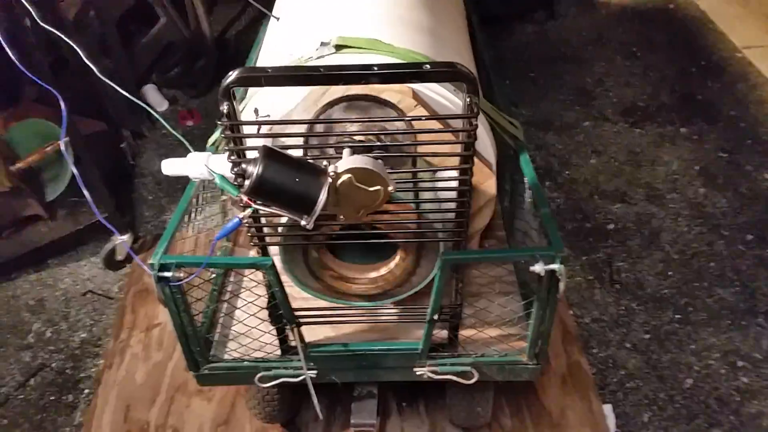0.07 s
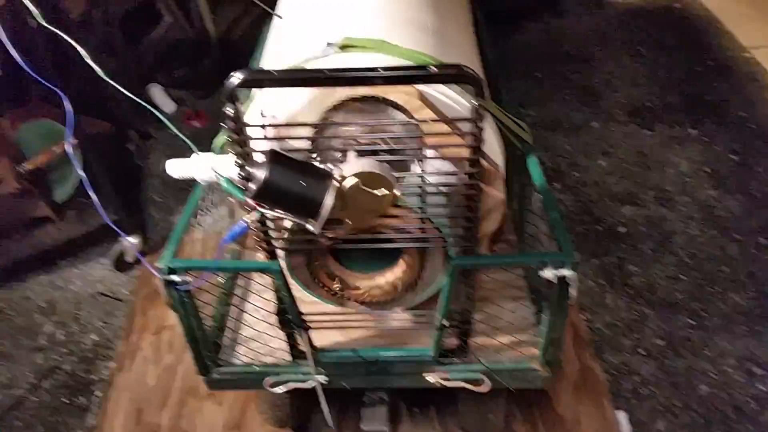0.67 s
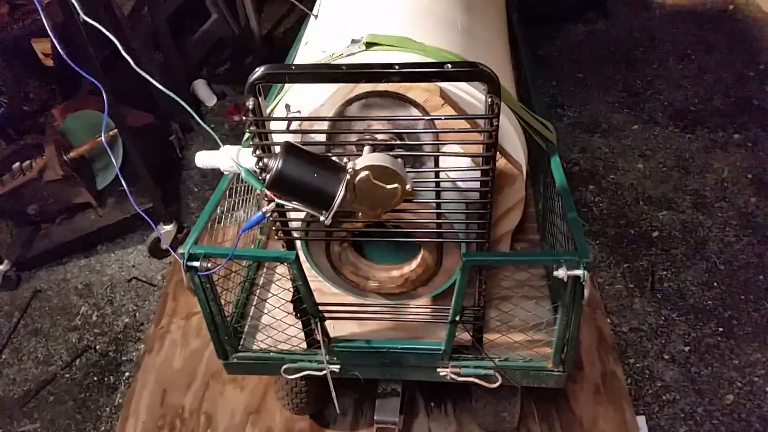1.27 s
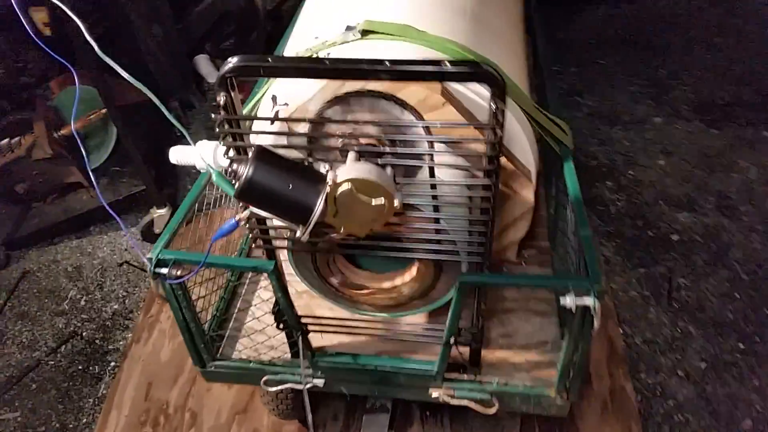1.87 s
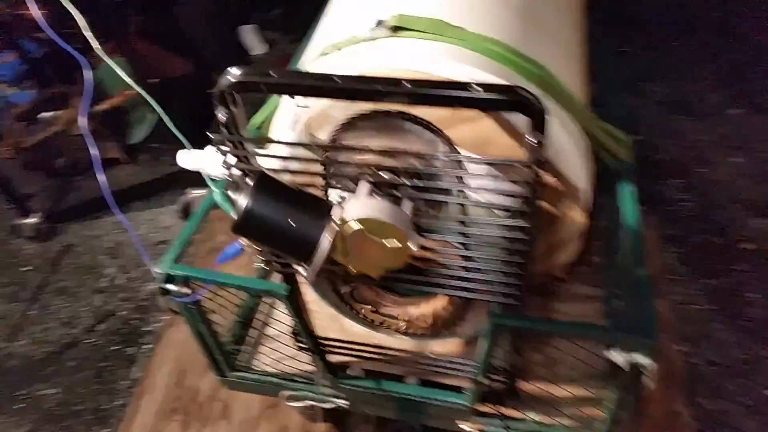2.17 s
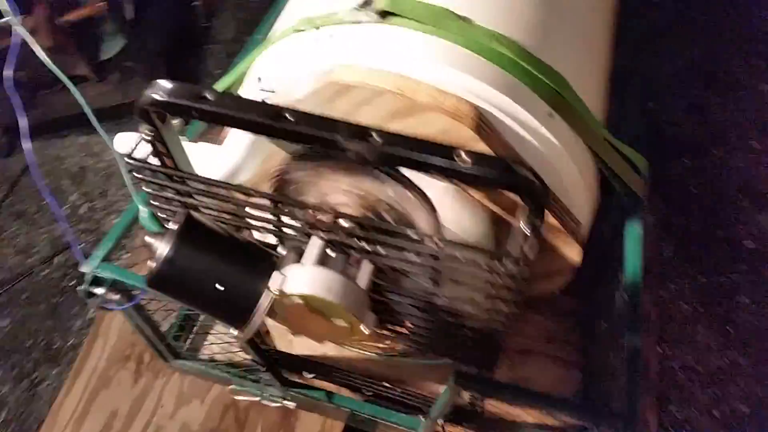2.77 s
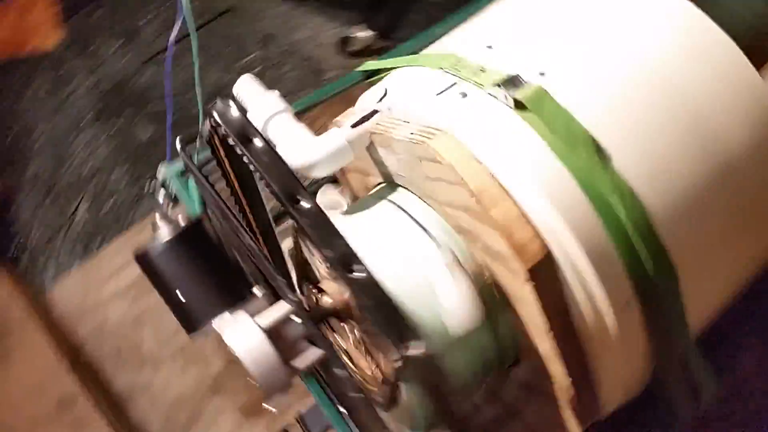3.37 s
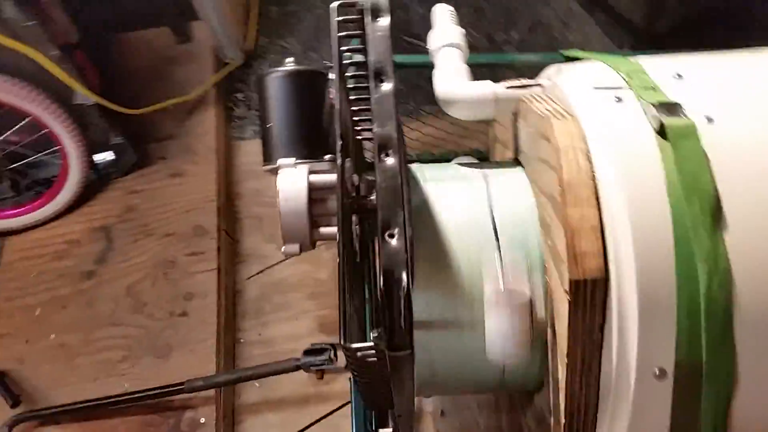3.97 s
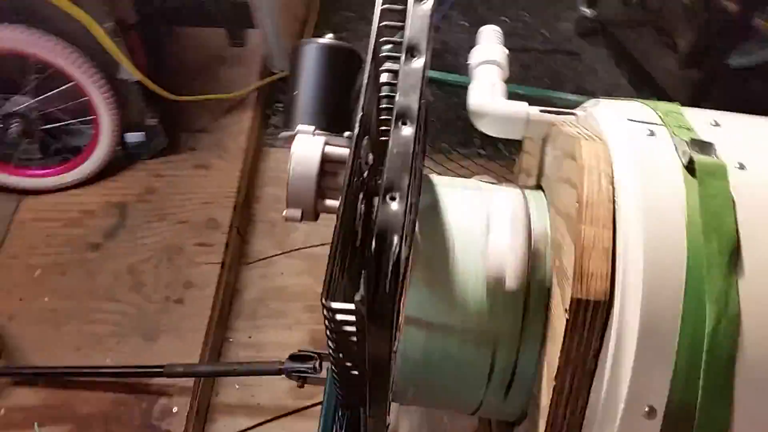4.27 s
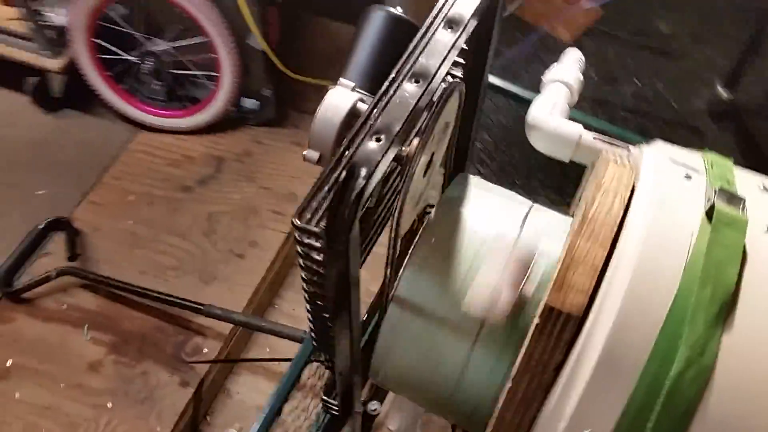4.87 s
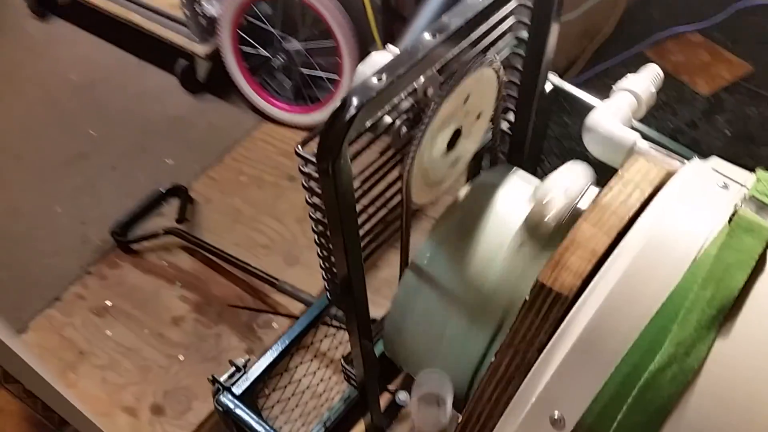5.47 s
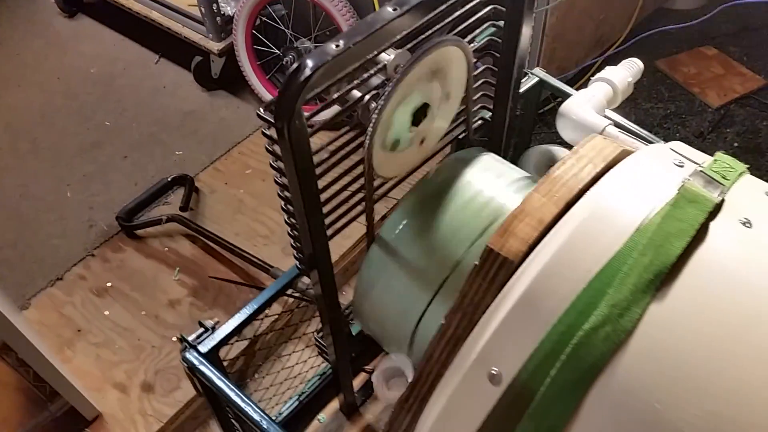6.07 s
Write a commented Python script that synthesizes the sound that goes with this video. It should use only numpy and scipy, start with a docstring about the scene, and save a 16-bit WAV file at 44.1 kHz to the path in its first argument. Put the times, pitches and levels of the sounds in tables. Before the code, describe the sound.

A small gear motor starts humming and a plastic drum begins to turn, a little under a second per turn. Each turn lurches, rumbles and knocks over rollers, then scrapes at the rim, while grit hisses and ticks down the wall. A sharp squeak comes just after the start. The hum fades as the close stereo microphone moves round to the side, and two more squeaks ring briefly in the workshop.

```python
"""A plastic trommel drum in a workshop, taken close on a stereo microphone carried from motor end to side.
After 0.4 s a small gear motor starts to hum, and the drum turns, each turn taking a little under a second.
Each turn opens with a lurch, rumbles and knocks over the rollers, and ends with two scrapes of the rim,
while grit hisses down the wall. Near 0.6 s the drive sticks and lets go with a sharp squeak that rings
in the room. From 2.3 s the hum fades as the microphone moves on; two more squeaks come at 4.3 and 5.3 s."""
import sys
import numpy as np
from scipy import signal
from scipy.fft import rfft, irfft
from scipy.io import wavfile
from scipy.ndimage import uniform_filter1d

SR = 44100
rng = np.random.default_rng(int(sys.argv[2]) if len(sys.argv) > 2 else 0)


def dump(signal):
    """Clip the signal to [-1, 1] and save it as 16-bit WAV at the path in sys.argv[1]."""
    limited = np.clip(np.atleast_2d(signal).T, -1, 1)
    pcm = np.round(limited * 32767).astype(np.int16)
    wavfile.write(sys.argv[1], SR, pcm)


N = 274743
T = np.arange(N) / SR
HZ = np.fft.rfftfreq(N, 1 / SR)

# The workshop's ring. Each row: frequency in Hz, seconds to die away by 60 dB.
WORKSHOP_DECAY = [(100, 0.34), (500, 0.22), (2500, 0.2), (8000, 0.2), (16000, 0.063)]
# The microphone's path. Each row: time in seconds, place from 0 (motor end) to 1 (side).
MIC_PATH = [(0.4, 0.041), (2.0, 0.1), (3.6, 0.61), (4.8, 0.89)]
# The microphone's two ports. Each row: frequency in Hz, left-right likeness from 0 to 1.
MIC_LIKENESS = [(30, .8), (120, .98), (300, .975), (550, .9), (800, .65), (1100, .1), (2000, .25),
                (4000, .05), (16000, 0)]
# Their balance. Each row: frequency in Hz, left minus right in dB.
MIC_BALANCE = [(100, -2.5), (300, -1.5), (1200, -0.5), (2200, -1), (3400, -1), (4600, -9), (6500, -4),
               (8200, -0.5), (9600, 10), (10500, 11.5), (12000, -0.5), (13500, 2), (15500, -11)]

# Tone colours at close range. Each row: frequency in Hz, relative level in dB.
GRIT_SPECTRUM = [(3000, -42), (7000, -18.5), (8400, -17.5), (9300, -9), (10200, -2), (12500, 3),
                 (14000, -1), (15300, 0.5), (16000, 0)]
RIM_SPECTRUM = [(900, -40), (1500, 18.5), (1950, 20), (2400, 11.5), (3000, 6.5), (3700, 8.5), (4700, 9.5),
                (5700, 6), (6700, -7), (8500, -32), (16000, -23)]
SQUEAK_SPECTRUM = [(900, -14), (1600, 5), (1950, 14), (2650, 2.5), (3150, -8.5), (3850, 3), (4700, -4.5),
                   (5350, 1), (5900, -2), (7000, -11.5), (8800, -12), (10600, 5), (13000, 8.5), (14200, -6),
                   (15500, 10)]
CLACK_SPECTRUM = [(200, -61), (500, 3.5), (900, 5), (1500, -0.5), (2100, -3.5), (2700, -29), (4500, -25),
                  (9000, -67)]
THUD_SPECTRUM = [(30, -12), (70, -23), (140, 20), (350, 13.5), (700, -34), (1500, -55), (4000, -106)]
BOOM_SPECTRUM = [(20, 0), (40, -14), (62, -10), (95, 3.5), (160, 12.5), (260, 2.5), (420, -9.5), (600, 3.5),
                 (1200, -65), (3000, -100)]
FRAME_END_SPECTRUM = [(200, -3), (450, 14.5), (620, 10), (900, 6), (1050, 8), (1400, 5.5), (1900, -4.5),
                      (2400, -12.5), (3000, -22), (4500, -27.5), (7000, -29.5), (12000, -99)]
FRAME_SIDE_SPECTRUM = [(200, -6), (420, 13.5), (720, 13.5), (1000, 10), (1400, 4), (1900, -1), (2400, -9.5),
                       (3000, -23.5), (4500, -29), (7000, -49), (12000, -99)]
# The drum shell's modes. Each row: frequency and width in Hz, gain in dB from the motor end, from the side.
SHELL_MODES = [(88, 14, -49, -8), (112, 7.6, -5.5, -5.5), (141, 12.5, 1.5, 11.5), (193.5, 4.3, -3.5, 1),
               (226.2, 22.3, 6, 3.5), (302.2, 12.6, -2, -4), (338.3, 21.5, 4.5, -4),
               (456, 13, -10.5, -12.5)]

# The drum's turns; levels from here on are relative.
# Each row: start in seconds, then boom, clatter, rim rub, grit hiss and opening lurch in dB.
DRUM_TURNS = [(0.452, -26, -30.5, -50.5, -39.5, -5.5), (1.406, -22, -25, -45.5, -34, -4),
              (2.356, -21.5, -24, -43.5, -31.5, 2), (3.268, -17.5, -22.5, -51.5, -35.5, 3.5),
              (4.183, -23, -27.5, -51, -39, 1), (5.125, -23.5, -26.5, -49, -37, 1.5),
              (6.063, -23.5, -26.5, -47, -35.5, 3)]
# Every turn: a lurch, a light stretch, a long climb. Each row: share of the turn, boom and clatter in dB.
ROLL_PATTERN = [(0.0, -2, -1.5), (0.05, 4.5, 5), (0.1, 2, 1), (0.16, -3, 1), (0.23, -2, -0.5),
                (0.3, -4.5, -3), (0.44, 2.5, 3), (0.485, 0, -3.5), (0.56, 3.5, 4.5), (0.66, 4, 4.5),
                (0.745, 0, 3), (0.82, 2, -1), (0.86, 0, 4.5), (0.945, -5, -2.5)]
# Light rubbing through every turn. Each row: share of the turn, rim and grit in dB.
RUB_PATTERN = [(0.0, -3.5, 0.5), (0.09, 4.5, 2), (0.2, -2.5, 2.5), (0.33, -4, 1.5), (0.48, -7, -3.5),
               (0.62, 3, 3.5), (0.78, 4, 4.5), (0.95, -3.5, -0.5)]
# Scrapes of the rim. Each row: start and length in seconds, rasp, loosened grit and squeal in dB,
# squeal pitch in Hz.
RIM_SCRAPES = [(0.487, 0.071, -68, -56, -60, 2000), (1.091, 0.066, -41, -35, -33.5, 1916),
               (1.221, 0.078, -41.5, -39, -44, 3900), (1.83, 0.021, -43, -30, -39, 4100),
               (2.038, 0.066, -37, -32, -33, 1907), (2.144, 0.11, -34.5, -39, -39.5, 1990),
               (2.405, 0.045, -55, -57, -41, 2130), (2.518, 0.015, -32, -36, -48, 2230),
               (2.979, 0.05, -42, -24.5, -30, 4000), (3.077, 0.088, -40, -28, -35.5, 3820),
               (3.313, 0.069, -46, -33, -38, 1910), (3.761, 0.1, -46, -35, -46, 2000),
               (3.909, 0.051, -38, -32, -35, 3660), (4.008, 0.096, -33.5, -36, -31, 2082),
               (4.193, 0.095, -42.5, -33, -43, 2010), (4.814, 0.056, -38.5, -34, -33, 2010),
               (4.94, 0.08, -39.5, -38, -35, 2193), (5.164, 0.11, -50, -38, -42, 2000),
               (5.75, 0.056, -37.5, -34, -34, 2000), (5.87, 0.092, -35, -40, -34, 2174),
               (6.087, 0.094, -62, -41, -34.5, 2014)]
# Single pieces of grit hitting the wall. Each row: start in seconds, level in dB.
GRIT_TICKS = [(1.6926, -11.5), (1.8457, -15), (2.0477, -5.5), (2.1765, -9), (2.3196, -8), (2.4384, -2.5),
              (2.5227, -13), (2.6579, -33), (2.9931, -19), (3.2126, -4.5), (3.261, -2.5), (3.6164, -14),
              (3.787, -21), (3.921, 1), (3.9394, -18), (4.0367, 2.5), (4.131, -6), (4.9606, -8),
              (5.874, -7)]
# The drum dropping onto its rollers. Each row: start in seconds, clack and thud in dB.
ROLLER_KNOCKS = [(0.47, -40, -34), (1.442, -27, -17.5), (1.616, -12.5, -35), (1.78, -21, -22),
                 (1.925, -24, -18), (2.383, -11.5, -22), (2.696, -10, -16), (2.818, -9, -18),
                 (3.134, -16, -38), (3.249, -14.5, -13.5), (3.426, -16, -33), (3.869, -14, -24),
                 (4.184, -17, -10.5), (4.47, -23, -17), (4.722, -15, -24), (4.808, -19, -15),
                 (5.721, -11, -14), (5.925, -17, -34)]
# Slips of the drive, bunched into three squeaks. Each row: start in seconds, level in dB,
# opening and settling slip rate in Hz, length in seconds, snap as a factor on the tone.
DRIVE_SLIPS = [(0.5975, -18.5, 2100, 2730, 0.028, 0.73), (4.315, -18, 1900, 1840, 0.0078, 1.4),
               (4.318, -14, 1994, 1833, 0.0058, 0.82), (4.334, -25.5, 1920, 1874, 0.018, .3),
               (5.2805, -18.5, 1590, 1930, 0.01, 1), (5.2834, -13.5, 2265, 2580, 0.018, 0.57)]

START_S, SPIN_UP_S, LAST_TURN_S = 0.41, 0.068, 0.96
BAND_LIMIT_HZ = 15900


def gain_of(db):
    """Decibels to amplitude."""
    return 10 ** (np.asarray(db) / 20)


def unit_rms(x):
    """Scales to rms 1."""
    return x / np.sqrt(np.mean(x ** 2) + 1e-20)


def drift(span, size=N):
    """Random wavering of rms 1, smoothed over span samples."""
    return unit_rms(uniform_filter1d(rng.standard_normal(size), span))


def at_hz(table, hz):
    """Reads a table along a log-frequency axis."""
    table_hz, value = np.transpose(table)
    return np.interp(np.log(hz + 1), np.log(table_hz + 1), value)


def add(mix, start_s, sound):
    """Mixes a sound in at start_s."""
    part = mix[round(start_s * SR):][:len(sound)]
    part += sound[:len(part)]


def colour(x, spectrum, size=4096):
    """Causal filter of unit energy with the given spectrum."""
    log_gain = np.log(gain_of(at_hz(spectrum, abs(np.fft.fftfreq(size, 1 / SR)))))
    taps = np.fft.ifft(np.exp(signal.hilbert(log_gain).conj())).real[:size // 2]
    return signal.oaconvolve(x, taps[None] / np.linalg.norm(taps), axes=1)[:, :N]


def steadied(x, span_s):
    """Evens out the power over span_s, leaving the faster grain."""
    size = int(span_s * SR)
    power = uniform_filter1d(uniform_filter1d(np.mean(x ** 2, 0), size), size // 4)
    return x / np.sqrt(abs(power) + 1e-9)


def impacts(per_s, spread_db):
    """Tiny random blows, mostly small and a few large."""
    size = gain_of(spread_db * np.minimum(rng.exponential(1, N), 4))
    return unit_rms(size * (rng.random(N) < per_s / SR) * rng.standard_normal((2, N)))


def blows(rows, decay_s, chatter, size=2000):
    """Each blow is one sharp push followed by a brief chatter."""
    out, t = np.zeros((2, N)), np.arange(size) / SR
    for start_s, db in rows:
        burst = rng.standard_normal((2, size)) * np.exp(-t / decay_s)
        burst *= chatter / np.linalg.norm(burst[0])
        burst[0, 0] += 1
        for channel, sound in zip(out, burst):
            add(channel, start_s, gain_of(db) * sound)
    return out


def grains(per_s, low_hz, high_hz, cycles, spread_db, overtone_db):
    """Short pitched grains at random moments, each with its own pitch, size and side."""
    out = np.zeros((2, N))
    for when, pitch, size, pan, right_lag in rng.random((int(per_s * N / SR), 5)):
        hz = low_hz + pitch * (high_hz - low_hz)
        age = np.arange(int(4 * cycles * SR / hz) + 2) * hz / SR  # in cycles
        swell = age / cycles * np.exp(-2 * age / cycles) * gain_of(-spread_db * np.log(size + 0.025))
        for channel, share, lag in (out[0], pan, 0), (out[1], 1 - pan, right_lag):
            angle = 2 * np.pi * (age + lag)
            wave = np.sin(angle) + gain_of(overtone_db) * np.sin(2 * angle) * (2 * hz < BAND_LIMIT_HZ)
            add(channel, when * N / SR, np.sqrt(share) * swell * wave)
    return unit_rms(out)


def workshop(x, wet_db, size=11000):
    """Direct sound plus the room's diffuse tail, whose echo pattern drifts round once a second."""
    out = x
    for share in np.cos(2 * np.pi * T), np.sin(2 * np.pi * T):
        hz, t, noise = signal.stft(rng.standard_normal((2, size)), SR, nperseg=256)
        decay = gain_of(-60 * t / at_hz(WORKSHOP_DECAY, hz)[:, None])
        tail = signal.istft(noise * decay, SR, nperseg=256)[1]
        tail /= np.linalg.norm(tail[0])
        out = out + gain_of(wet_db) * signal.oaconvolve(x * share, tail, axes=1)[:, :N]
    return out


def mic_place():
    """Where the microphone is: 0 at the motor end, 1 at the side."""
    return np.interp(T, *np.transpose(MIC_PATH))


def mic_ports(x):
    """The two ports hear much the same in the bass, where the waves are long."""
    mid, side = rfft(x)
    likeness = at_hz(MIC_LIKENESS, HZ)
    mid, side = mid * np.sqrt((1 + likeness) / 2), side * np.sqrt((1 - likeness) / 2)
    return irfft(np.array([mid + side, mid - side]), N)


def mic_lag(x, end_lag_s=-0.00006, side_lag_s=0.00034):
    """At the side of the machine its sound reaches the right port first."""
    lag_s = end_lag_s + (side_lag_s - end_lag_s) * mic_place() ** 4
    return np.array([np.interp(T - lag_s, T, x[0]), x[1]])


def turns_made():
    """How many turns the drum has made at each moment."""
    starts = [row[0] for row in DRUM_TURNS] + [DRUM_TURNS[-1][0] + LAST_TURN_S]
    return np.interp(T, starts, np.arange(len(starts)))


def pattern_db(table, column):
    """One column of a pattern that comes round with every turn."""
    rows = np.array(table)
    return np.interp(turns_made() % 1, rows[:, 0], rows[:, column], period=1)


def turn_gain(column, stall_db=-8.5, stall_lag_s=0.011, stall_s=0.028):
    """A level gliding from turn to turn: silent until spin-up, dipping as the drum stalls at a squeak."""
    db = np.interp(turns_made(), np.arange(len(DRUM_TURNS)) + .5, np.array(DRUM_TURNS)[:, column])
    from_stall_s = np.minimum.reduce([abs(T - (row[0] + stall_lag_s)) for row in DRIVE_SLIPS])
    stuck = np.exp(-np.minimum(from_stall_s / stall_s, 10) ** 2)
    spin_up = np.clip((T - START_S) / SPIN_UP_S, 0, 1) ** 3
    return gain_of(db + stall_db * stuck) * spin_up


def stroke(length_s, attack_s=0.011, release_s=0.035):
    """Envelope of one scrape: attack, hold, release."""
    t = np.arange(0, length_s + release_s / 2, 1 / SR)
    return np.minimum(t / attack_s, 1) * np.minimum((t[-1] - t) / release_s, 1)


def friction(column):
    """Strength of the rim (1) or grit (2): light rubbing all the way round, plus the scrapes."""
    out = turn_gain(column + 2) * gain_of(pattern_db(RUB_PATTERN, column))
    for row in RIM_SCRAPES:
        add(out, row[0], gain_of(row[column + 1]) * stroke(row[1]))
    return out


def rolling(column):
    """Strength of the boom (1) or clatter (2) through each turn."""
    return turn_gain(column) * gain_of(pattern_db(ROLL_PATTERN, column))


def motor(mesh_hz=358.5, sag_hz_per_db=4, wander=0.0084, fade_at_s=2.3, fade_s=0.69):
    """The gear mesh hums, its pitch sagging under load; it fades as the microphone moves on."""
    load_db = uniform_filter1d(pattern_db(ROLL_PATTERN, column=1), 3000)
    hz = (mesh_hz - sag_hz_per_db * load_db) * (1 + wander * drift(2000))
    flutter = 1 + 0.24 * drift(1500)
    fade = np.exp(-np.maximum(T - fade_at_s, 0) / fade_s)
    return gain_of(-6) * turn_gain(column=1) * flutter * fade * np.sin(2 * np.pi * np.cumsum(hz) / SR)


def grit(closest_at_s=3.9, passing_s=0.55):
    """Grit slides down the wall in clumps and pings; the finest sizzles as the microphone passes close."""
    clumps = gain_of(4.2 * drift(450))
    hiss = unit_rms(colour(clumps * impacts(per_s=4000, spread_db=0), GRIT_SPECTRUM))
    pings = grains(per_s=400, low_hz=9900, high_hz=15600, cycles=12, spread_db=2.2, overtone_db=-20)
    sliding = steadied(workshop(hiss + gain_of(-8) * pings, wet_db=-4), span_s=0.15)
    sizzle = grains(per_s=350, low_hz=14600, high_hz=15700, cycles=12, spread_db=2.5, overtone_db=-20)
    nearness = np.exp(-((T - closest_at_s) / passing_s) ** 2)
    return friction(column=2) * (gain_of(-2.5) * sliding + gain_of(-6) * nearness * sizzle)


def rim_rasp():
    """The rim rasps in bouts, and catches in many tiny squeals as it does."""
    rasp = unit_rms(colour(impacts(per_s=4000, spread_db=5.5), RIM_SPECTRUM))
    squeals = grains(per_s=260, low_hz=1714, high_hz=2390, cycles=10, spread_db=11.5, overtone_db=-4.5)
    rubbed = workshop(rasp + gain_of(-6) * squeals, wet_db=-1)
    return gain_of(3.5) * friction(column=1) * steadied(rubbed, span_s=0.05)


def rim_squeal(pitch_spread=0.14, spread_db=4, catch_s=0.004):
    """In a hard scrape the rim sings, jumping in pitch and strength from one catch to the next."""
    out = np.zeros((2, N))
    for start_s, length_s, _, _, db, hz in RIM_SCRAPES:
        envelope = stroke(length_s)
        catch = (np.arange(len(envelope)) / SR / catch_s).astype(int)
        for channel in out:
            pitch, size = rng.standard_normal((2, 200))[:, catch]
            tone = np.sin(2 * np.pi * np.cumsum(hz * np.exp(pitch_spread * pitch)) / SR)
            strength = uniform_filter1d(gain_of(spread_db * size), 60)
            add(channel, start_s, gain_of(db) * envelope * unit_rms(tone * strength))
    return gain_of(-1.5) * workshop(out, wet_db=-5)


def drive_squeaks(roughness=0.5, snap_s=0.0043, jitter=0.0027, settle_s=0.00337, subtone=0.23):
    """The drive lets go with a snap, then slips quickly at a rate that glides and settles."""
    out = np.zeros((2, N))
    for start_s, db, first_hz, settled_hz, length_s, snap in DRIVE_SLIPS:
        t = np.arange(int(length_s * SR)) / SR
        hz = settled_hz + (first_hz - settled_hz) * np.exp(-t / settle_s)
        hz *= 1 + jitter * drift(40, len(t))
        cycles = np.cumsum(hz) / SR
        for channel in out:
            skew = rng.uniform(-.1, .1)  # higher partials differ more in phase between the ports
            tone = sum(np.cos(2 * np.pi * k * (cycles + k * skew)) * (k * hz < BAND_LIMIT_HZ)
                       for k in range(1, 9))
            slips = unit_rms(tone) * (1 + subtone * np.cos(np.pi * cycles))  # strong and weak by turns
            rasp = (roughness + snap * np.exp(-t / snap_s)) * rng.standard_normal(len(t))
            add(channel, start_s, gain_of(db) * (slips + rasp) * (1 - (t / length_s) ** 2))
    return gain_of(-3) * workshop(colour(out, SQUEAK_SPECTRUM), wet_db=2.5)


def knocks():
    """The drum drops onto a roller with a clack and a dull thud; larger grit ticks on the wall."""
    rows = np.array(ROLLER_KNOCKS)
    clacks = colour(blows(rows[:, [0, 1]], decay_s=0.0032, chatter=0.75), CLACK_SPECTRUM)
    thuds = colour(blows(rows[:, [0, 2]], decay_s=0.015, chatter=0.17), THUD_SPECTRUM)
    hits = blows(GRIT_TICKS, decay_s=0.00094, chatter=1.7)
    ticks = colour(hits, GRIT_SPECTRUM) + gain_of(-12) * colour(hits, RIM_SPECTRUM)
    direct = gain_of(12) * clacks + gain_of(20.5) * thuds + gain_of(-4.5) * ticks
    return mic_ports(workshop(direct, wet_db=4))


def frame(bumps):
    """The frame clatters, its colour shifting between the motor end and the side."""
    side = mic_place()
    return (1 - side) * colour(bumps, FRAME_END_SPECTRUM) + side * colour(bumps, FRAME_SIDE_SPECTRUM)


def shell(bumps):
    """The drum rings in its modes; which of them carry depends on where the microphone is."""
    side, out = mic_place(), 0
    for hz, width_hz, end_db, side_db in SHELL_MODES:
        ring = signal.lfilter(*signal.iirpeak(hz, hz / width_hz, SR), bumps)
        out = out + ring * np.sqrt(SR / (np.pi * width_hz)) * gain_of(end_db + side * (side_db - end_db))
    return out / 2


def lurches(at_turns=0.039, width_turns=0.15):
    """Weight of the boom as each turn opens, heavier in some turns than in others."""
    past = turns_made() - at_turns
    nearest = np.clip(np.round(past), 0, len(DRUM_TURNS) - 1).astype(int)
    lurch_db = np.array(DRUM_TURNS)[nearest, -1]
    return gain_of(lurch_db * np.exp(-((past - nearest) / width_turns) ** 2))


def drum_rumble():
    """Bumps under the rollers boom in the shell and clatter in the frame."""
    bumps = impacts(per_s=1600, spread_db=2)
    lowpass = signal.butter(3, 600, fs=SR, output="sos")
    soft_bumps = signal.sosfilt(lowpass, impacts(per_s=700, spread_db=2))
    boom = mic_ports(colour(bumps, BOOM_SPECTRUM) + gain_of(2) * shell(soft_bumps))
    boom = gain_of(1) * rolling(column=1) * lurches() * steadied(boom, span_s=0.036)
    clatter = mic_ports(workshop(frame(bumps), wet_db=-3))
    clatter = gain_of(-1) * rolling(column=2) * steadied(clatter, span_s=0.1)
    return mic_lag(boom + clatter)


def scene():
    """The whole machine from close by."""
    return drum_rumble() + mic_ports(rim_rasp() + rim_squeal() + grit()) + knocks() + drive_squeaks() + motor()


def record(dry, low_cut_hz=52, ceiling=0.9):
    """Each port colours the sound its own way; then come a low cut, rounded peaks and the band limit."""
    balance = gain_of(np.array([[.5], [-.5]]) * at_hz(MIC_BALANCE, HZ))
    heard = irfft(rfft(dry) * balance / np.sqrt(np.mean(balance ** 2, 0)), N)
    heard = signal.sosfilt(signal.butter(2, low_cut_hz, "high", fs=SR, output="sos"), heard)
    heard = heard / (1 + (heard / ceiling) ** 8) ** (1 / 8)
    lowpass = signal.firwin(601, BAND_LIMIT_HZ, window=("kaiser", 9), fs=SR)
    return signal.oaconvolve(heard, lowpass[None], "same")


dry = scene()
out = record(dry)
dump(out)
```